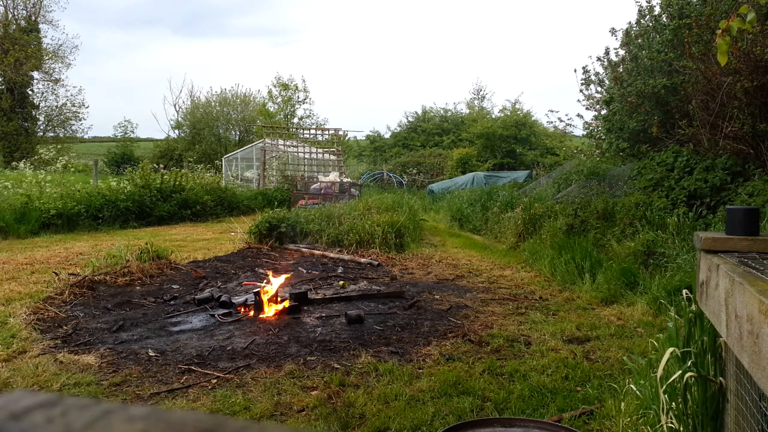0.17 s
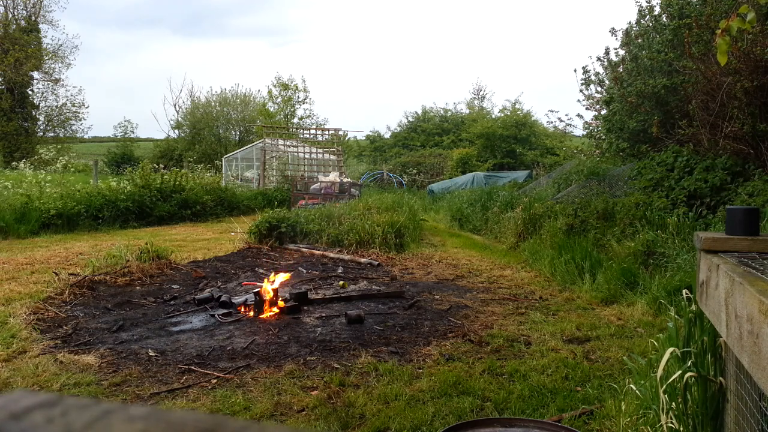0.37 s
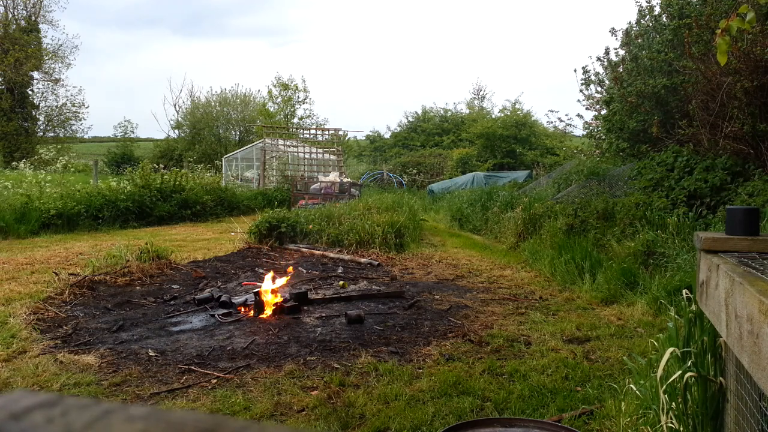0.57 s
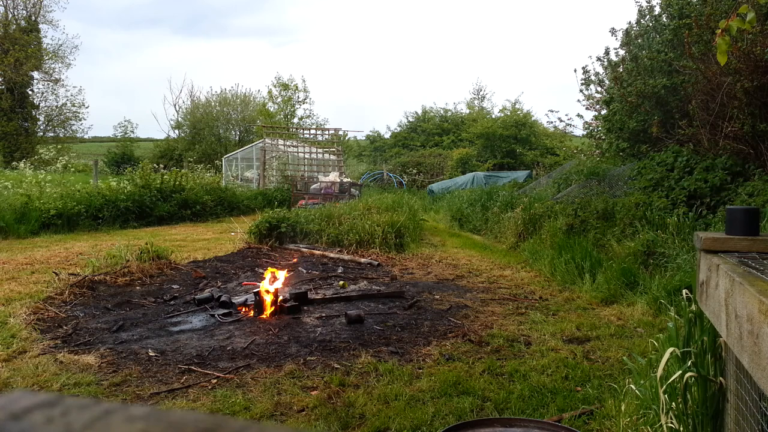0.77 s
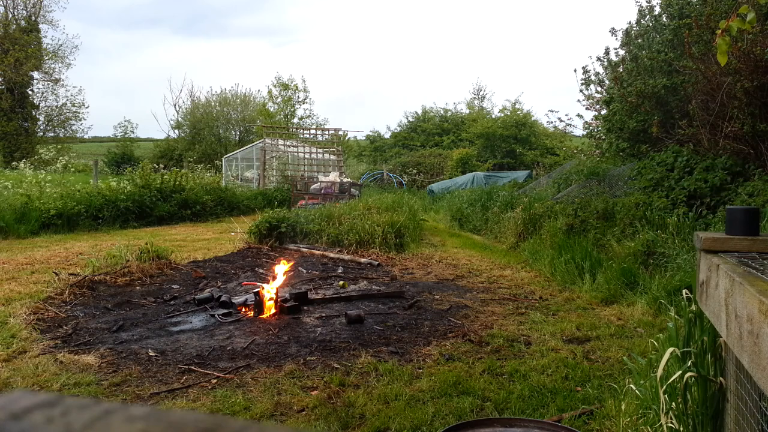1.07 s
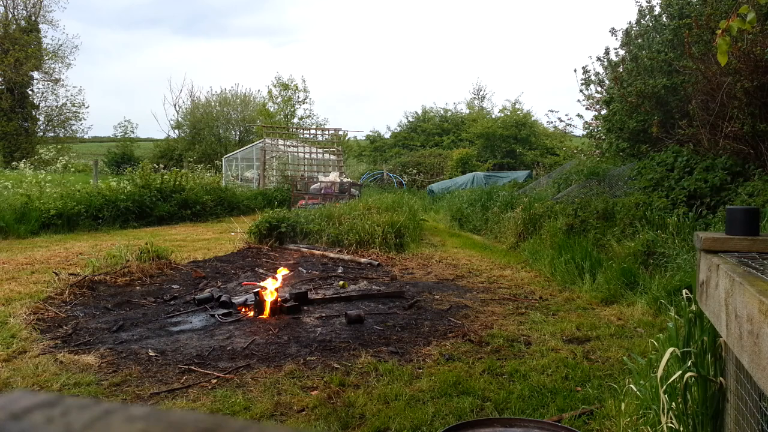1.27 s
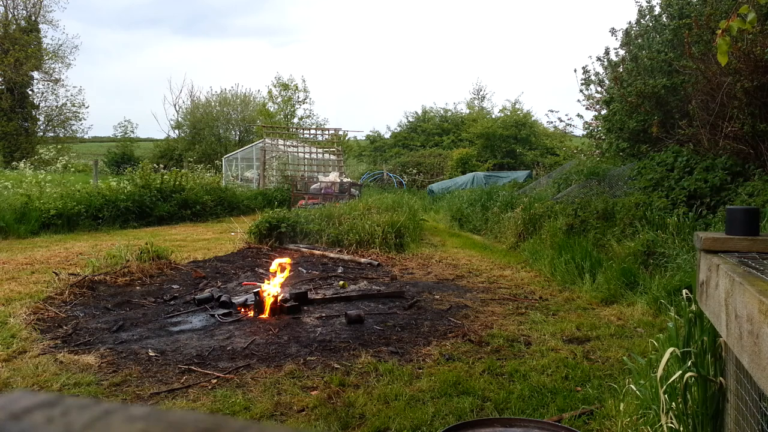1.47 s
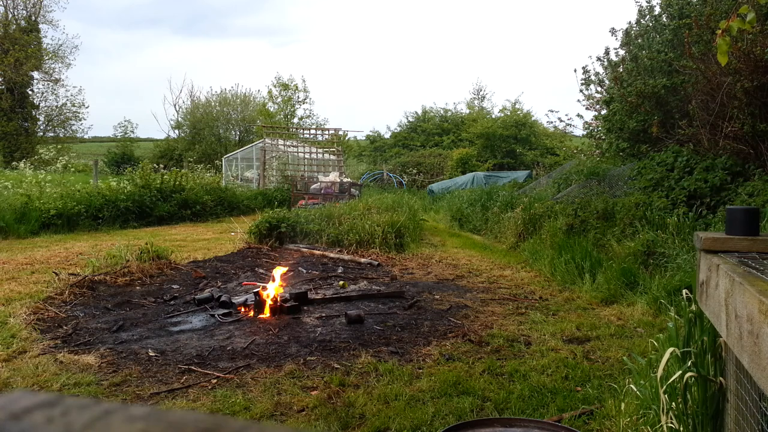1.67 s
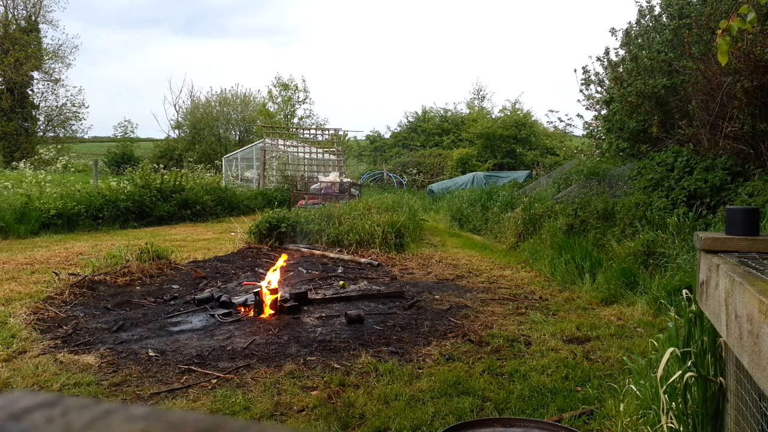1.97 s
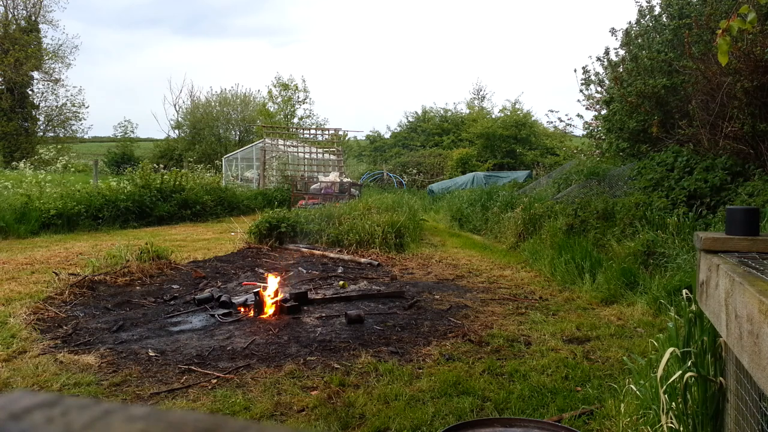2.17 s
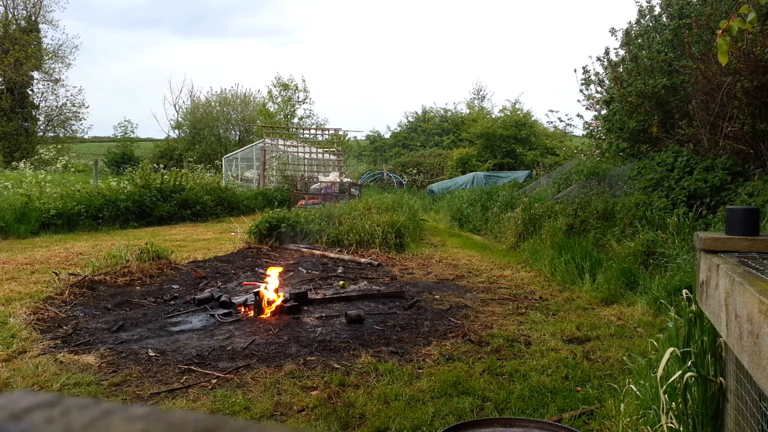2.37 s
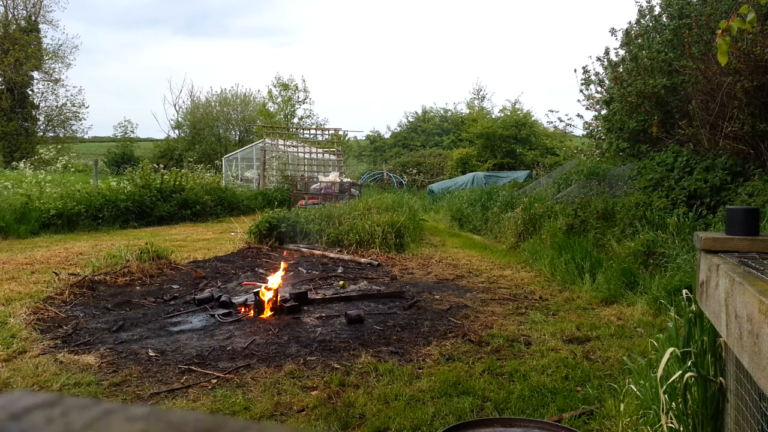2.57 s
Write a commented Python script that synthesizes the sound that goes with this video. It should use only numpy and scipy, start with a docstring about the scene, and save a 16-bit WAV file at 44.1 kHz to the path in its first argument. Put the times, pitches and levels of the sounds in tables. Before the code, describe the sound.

Small wood fire crackling and softly fluttering outdoors, with birdsong and faint twitters over quiet air

```python
"""A quiet garden with a small bonfire, a few metres from two spaced microphones.
The wood crackles as sharp clicks that ring briefly; the flames flap as low pushes of a few cycles.
One songbird whistles ahead, another to the side, and small birds twitter far off: all wavering sines.
Filtered noise makes the distant country rumble and the microphone hiss behind them."""
import sys
import numpy as np
from scipy import signal
from scipy.fft import rfft, irfft, next_fast_len
from scipy.io import wavfile

SR = 44100
rng = np.random.default_rng(int(sys.argv[2]) if len(sys.argv) > 2 else 0)


def put_to_file(sound):
    """Save the sound as 16-bit audio at rate SR, in the file named by the first command-line argument."""
    columns = np.atleast_2d(sound).T  # one column per channel
    safe = np.clip(columns, -1, 1)
    whole_steps = np.round(safe * 32767)
    wavfile.write(sys.argv[1], SR, whole_steps.astype(np.int16))


def rack_gain(trim_db):
    """Turn a fader trim in dB into the linear factor to multiply a signal by."""
    fader = np.asarray(trim_db, float)
    return 10 ** (fader / 20)


N = 120393  # length in samples

# rumble, leaves and hiss, shape of the spectrum: (f/Hz, relative level per Hz/dB)
AIR_SPECTRUM = [(35, -38), (60, -8.5), (97, -1.5), (147, -1.5), (450, -9), (517, -3.5), (593, -13.5),
                (817, -11), (1290, -17), (1740, -16), (3880, -19.5), (5340, -24.5), (5990, -26),
                (9690, -22.5), (14300, -23.5)]
# overall loudness of the air: (t/s, rms level/dB)
AIR_LOUDNESS = [(0.0, -55.5), (0.22, -55.5), (1.08, -55), (1.56, -57), (1.75, -55.5), (2.73, -56)]
# how alike the air is at left and right: (f/Hz, likeness, 1 = the same)
AIR_LIKENESS = [(25, 0.27), (60, 0.77), (200, 0.12), (700, 0.12), (1500, 0.015), (5000, 0.015),
                (15000, .02)]
AIR_FLICKER_DB = 0.24

# notes of the bird to the side: (start t/s, length/s, from f/Hz, to f/Hz, level/dB)
SIDE_NOTES = [(0., 0.065, 1810, 1715, -65), (0.38, .1, 3385, 4200, -69), (0.819, 0.05, 1875, 1800, -63),
              (0.987, 0.039, 2570, 1324, -63), (1, 0.028, 1900, 1880, -78)]
# twitters of far birds: (start t/s, length/s, from f/Hz, to f/Hz, level/dB, left minus right/dB)
TWITTERS = [(0.205, 0.05, 2243, 2084, -73, -14), (0.656, 0.023, 2690, 2510, -62.5, -5),
            (0.696, 0.042, 2520, 2510, -71.5, 3), (1.185, 0.056, 1456, 1460, -70, 6),
            (1.272, 0.048, 1500, 1555, -72, 10), (1.365, 0.056, 1490, 1536, -72, 9),
            (1.69, .055, 2370, 2406, -71.5, 0), (1.722, .02, 2560, 2680, -68, 4),
            (1.687, 0.04, 3880, 3610, -68, -8), (1.771, 0.046, 2124, 2237, -66.5, 1),
            (1.795, 0.0257, 3256, 3030, -63, -2.), (1.847, 0.087, 2890, 2870, -74, -3),
            (1.87, .06, 4050, 4120, -76, -14), (2.01, 0.025, 5240, 5500, -67.5, 1),
            (2.03, 0.03, 2550, 2610, -71.5, -3), (2.064, 0.037, 2750, 2950, -69, -6),
            (2.079, .012, 3520, 3700, -68, 0), (0.147, 0.043, 7550, 7800, -70, 2),
            (2.154, 0.0175, 3750, 3980, -65, -1.), (2.243, 0.031, 5100, 5520, -69.5, 5),
            (2.325, 0.019, 2940, 3080, -69, -2), (2.394, 0.014, 3850, 4070, -58.5, -1.),
            (2.408, 0.045, 2867, 2885, -64, -4), (2.545, 0.027, 4550, 4660, -69, 2.),
            (2.588, 0.046, 4730, 4690, -66.5, 0), (2.539, .04, 3800, 3780, -79, -10),
            (2.651, 0.02, 3770, 3810, -71, -11), (2.69, 0.033, 4700, 4800, -73, 1)]
# whistled phrases of the bird ahead, one list a note: (t/s, f/Hz, level/dB)
# at times both halves of its voice box sound together
SONG = [
    [(0.26, 2298, -56), (0.266, 2369, -64.5), (0.312, 2305, -63.5), (0.333, 2270, -62.5),
     (0.355, 2342, -62), (0.406, 2325, -67), (0.46, 2200, -68), (0.5, 2080, -69), (0.525, 1996, -64)],
    [(0.53, 1928, -69), (0.62, 1924, -69.5), (0.644, 1810, -68), (0.65, 1813, -75)],
    [(0.68, 1921, -63), (0.696, 1899, -67.5), (0.745, 2002, -66), (0.79, 2022, -65), (0.83, 2140, -66.5),
     (0.878, 2210, -61.5), (0.92, 2190, -72), (0.96, 2176, -65)],
    [(0.97, 2560, -75), (0.98, 2520, -63.5), (1.02, 2380, -60.5), (1.06, 2290, -62), (1.08, 2074, -68),
     (1.105, 1904, -60.5), (1.16, 1910, -54.5), (1.17, 1960, -69), (1.185, 2020, -68)],
    [(1.075, 2257, -63), (1.12, 2194, -63), (1.165, 2280, -69)],
    [(1.19, 1732, -59), (1.196, 1727, -70), (1.24, 1772, -66)],
    [(1.28, 1764, -70), (1.35, 1796, -64), (1.368, 1783, -87), (1.385, 1770, -66), (1.436, 1767, -65.5),
     (1.498, 1784, -69), (1.535, 1777, -65), (1.58, 1793, -69), (1.6, 1810, -84), (1.62, 1856, -68),
     (1.668, 1858, -65.5), (1.73, 1815, -72)],
    [(1.87, 1730, -69.5), (1.91, 1808, -75), (1.924, 1746, -64), (1.96, 1517, -69), (2.008, 1487, -64.5),
     (2.03, 1480, -81)],
    [(2.15, 2495, -74), (2.162, 2473, -66), (2.182, 2505, -64), (2.205, 2300, -71), (2.25, 2166, -77),
     (2.3, 2150, -74), (2.335, 2180, -78), (2.36, 2350, -71), (2.385, 2420, -77)],
    [(.46, 2317, -74), (.6, 2150, -74)],
    [(.74, 1870, -62.5), (.8, 1950, -68.5), (.91, 1880, -68)],
    [(.8, 1800, -71), (.87, 1794, -82)],
    [(1., 2510, -65), (1.07, 2380, -74)],
    [(1.075, 2300, -61.5), (1.165, 2340, -70)],
    [(2.2, 2430, -72), (2.27, 2360, -75)],
]
# where each note of the bird ahead sits: (left minus right/dB)
SONG_PAN_DB = [-1, 0, -3, 1.5, -1, -4, 3, 6.5, 5, 3, 0, 0, -6, 5, 4]
# how much later the left microphone hears each source; negative means the right is later
SIDE_LAG_S, TWITTER_LAG_S, SONG_LAG_S, FIRE_LAG_S = -0.0002, .00004, .00003, .00007
NOTE_EDGE_S = 0.0033  # soft start and end of a note
PITCH_WAVER, FAR_WAVER, WAVER_HZ = .005, .012, 110.  # waver as a share of the pitch, and its rate
THROB_DB, THROB_HZ = 1.5, 70.  # quick level waver of each note
FADING_DB, FADING_HZ = 2., 50.  # level waver at each microphone
GARDEN_T60_S, GARDEN_DB = 0.3, -7.  # time for the echoes to fall by 60 dB, and their strength

# sharp cracks of the wood:
# (t/s, strike level at 4 kHz/dB, brightness/dB per octave, left minus right at 4 kHz/dB)
CRACKS = [(0.016, -45, 1, -13), (0.1122, -35.5, 2.5, -10), (0.3033, -40, -1, 0), (0.3073, -44, 8, -10),
          (0.3127, -39, 0, -4), (.53, -39.5, -8, -6), (.6072, -37, -3, -1), (0.6148, -38.5, -6, -6),
          (0.7454, -31, -1.5, 0), (0.8788, -34, -2, -5), (0.9407, -38, -5, -1.), (1.3998, -41, 0, -5),
          (1.6306, -38, 0, -5.), (1.6329, -37, -2, -6), (1.6356, -37, -7, -4), (1.6464, -41, -1, 9),
          (1.6475, -40, -6, -1), (1.662, -27, 1.5, -4.8), (1.862, -38, 1, -8), (1.978, -36, 1, -7),
          (2.5912, -36.5, 4, -8.5)]
# the fibres tear on after a crack: (mean delay/s, level against the crack/dB)
SPLINTERS = [(.0005, -8.), (.0015, -13.), (.004, -15.), (.009, -21.)]
# what a crack rings with: (f/Hz, level/dB, time to fall by 60 dB/s)
EMBER_MODES = [(1800, -20.5, 0.0018), (2120, -23, 0.003), (3630, -11, 0.0026), (4800, -15, 0.0031),
               (8130, -19.5, 0.0045), (10030, -13.5, 0.0018), (13200, -17, 0.0015)]
CRACK_COLOUR_DB = 1.5  # chance spread of the strike from mode to mode
MODE_STAGGER_S = .0001  # the modes start spread over about this time
CRACK_LOW_HZ = 1300.  # a splinter is too small to radiate bass
LEFT_BRIGHTER_DB = 12  # left minus right, per octave above 4 kHz
GROUND_ECHO_S, GROUND_ECHO_DB = .0006, -21.5
CRACK_ECHO_DB = -4.  # added to the garden's own echo strength
TICKS_PER_S = 300.  # before the rate swings
TICK_DB, TICK_SPREAD_DB = -54, 3.  # smallest tick strike, and spread above it

# dull flaps of the flames: (t/s, push strength/dB, f/Hz, sharpness/dB, left minus right/dB)
FLAPS = [(0.125, -43, 218, -0.5, -6), (0.159, -65, 151, 0.1, 1), (0.194, -38.5, 237, 2, -1),
         (0.222, -42.5, 312, -2, 8), (0.249, -38.5, 292, -4.5, -2), (0.283, -52, 204, -2, 3),
         (0.386, -44, 180, 2.5, -4), (0.425, -38.5, 190, -1.5, -2), (0.489, -54, 347, -2, 1.5),
         (0.679, -50, 150, -1, -6), (0.816, -41, 365, -2, -3), (0.86, -52.5, 242, 9, 2.5),
         (0.954, -43, 220, 4, 2), (0.977, -44.5, 170, 4.5, -2), (0.994, -41.5, 305, 0, 4),
         (1.051, -54.5, 159, 10, 3), (1.1, -38.5, 280, -5, -2), (1.158, -42, 322, 0, 2),
         (1.212, -49.5, 296, 1.5, 7), (1.266, -65, 239, -6, 0), (1.305, -48, 245, 6.5, -4),
         (1.398, -44.5, 190, 2, 7), (1.675, -51, 218, 2, -23), (1.712, -41.5, 313, -3, -1),
         (1.818, -43, 318, -3, 7), (1.867, -40, 450, -13, 3), (1.921, -43.5, 205, -1, 0.5),
         (1.979, -44.5, 250, 1, -6), (2.029, -43, 280, 3.5, 3), (2.165, -60, 258, -17, -1),
         (2.192, -36, 182, -6.5, -1), (2.435, -47.5, 146, 7.5, 0), (2.458, -46.5, 234, 7, 3),
         (2.597, -48, 157, 6.5, 3), (2.643, -61, 306, 18.5, 2.0)]
# sharper, higher part that follows the start of a flap:
# (multiple of its pitch, level before sharpness/dB)
FLAP_SNAP = [(2.1, 0.5), (3.6, -39)]
FLAP_SNAP_S = 0.002956  # delay of this part
FLAP_CYCLES = 2.16  # cycles in which one ringing falls by 60 dB
FLUTTERS_PER_S = 120.  # before the rate swings
FLUTTER_DB, FLUTTER_SPREAD_DB = -66.5, 5  # rms before the flame band filter, and spread of sizes
FLUTTER_HZ, FLAME_HZ = (124, 760), (170., 1500.)  # flutter pitches, band of all flame sound

MIC_LOW_HZ, MIC_HIGH_HZ = 61.7, 14970


def rms_one(x):
    """Scale to an rms of 1."""
    return x / np.sqrt(np.mean(x ** 2) + 1e-20)


def at_hz(points, hz):
    """Read a spectrum table, drawing straight lines on a log frequency scale."""
    table_hz, value = np.transpose(points)
    return np.interp(np.log(hz), np.log(table_hz), value)


def drift(rate_hz):
    """Smooth chance wandering with a spread of 1, made from slowed-down noise."""
    r = np.exp(-80 * np.pi * rate_hz / SR)  # computed at every 40th sample
    noise = rng.standard_normal(N // 40 + 2002)
    slow = signal.lfilter([1], [1, -2 * r, r * r], noise)[2000:]  # skip the settling
    return np.interp(np.arange(N) / 40, np.arange(len(slow)), rms_one(slow - slow.mean()))


def ring(clicks, hz, t60):
    """A resonance: a unit click starts a sine of height 1 that falls by 60 dB in t60 seconds."""
    r, w = rack_gain(-60 / (t60 * SR)), 2 * np.pi * hz / SR
    return signal.lfilter([0, np.sin(w)], [1, -2 * r * np.cos(w), r * r], clicks + 1e-18)


def random_starts(per_s):
    """Chance events whose rate swings slowly up and down."""
    return rng.random(N) < per_s * rack_gain(3. * drift(6.)) / SR


def spaced(x, lag_s):
    """Sound takes time to travel: the left microphone hears it lag_s later than the right."""
    x, size = np.broadcast_to(x, (2, N)), next_fast_len(N + 64)
    half_shift = np.pi * np.fft.rfftfreq(size, 1 / SR) * lag_s * np.array([[1], [-1]])
    return irfft(rfft(x, size) * np.exp(-1j * half_shift), size)[:, :N]


def pan(db):
    """Left and right gains for a level difference in dB."""
    half = .5 * np.asarray(db)
    return rack_gain(np.array([half, -half]))


def whistle(s, hz, db, waver=PITCH_WAVER):
    """A near sine along a pitch and level curve, with soft edges and a slight waver."""
    t = np.arange(N) / SR
    edge = np.clip(np.minimum(t - s[0], s[-1] - t) / NOTE_EDGE_S + .5, 0, 1)
    pitch = np.interp(t, s, hz) * (1 + waver * drift(WAVER_HZ))
    level = rack_gain(np.interp(t, s, db) + THROB_DB * drift(THROB_HZ))
    return np.sqrt(2) * level * edge * np.sin(2 * np.pi * np.cumsum(pitch) / SR)


def garden(x):
    """Scattered echoes from hedges and sheds: fading noise, different at each microphone."""
    t = np.arange(int(.4 * SR)) / SR
    tail = rng.standard_normal((2, len(t))) * rack_gain(-60 * t / GARDEN_T60_S)
    tail = tail * (t > .004)  # no echo arrives at once
    tail = tail / np.sqrt((tail ** 2).sum(axis=1, keepdims=True))
    return rack_gain(GARDEN_DB) * signal.fftconvolve(x, tail, axes=1)[:, :N]


def air():
    """Third-octave bands of stereo noise, each with its own level, flicker and likeness."""
    out, together = 0, drift(3.)
    edges = 20 * 2 ** (np.arange(30) / 3)
    white = rng.standard_normal((2, 2, N))
    for k, (low, high) in enumerate(zip(edges, edges[1:])):
        band = signal.butter(2, [low, high], "band", fs=SR, output="sos")
        mid, side = signal.sosfilt(band, white[k % 2])  # neighbouring bands use different noise
        hz = np.sqrt(low * high)
        alike = np.clip(at_hz(AIR_LIKENESS, hz), -1, 1)
        flicker_db = AIR_FLICKER_DB * (0.09 * together + drift(6.9))
        gain = rack_gain(at_hz(AIR_SPECTRUM, np.clip(hz, 60, 14300)) + flicker_db)
        out = out + gain * (np.sqrt(1 + alike) * mid + np.sqrt(1 - alike) * side * [[1], [-1]])
    s, db = np.transpose(AIR_LOUDNESS)
    return rack_gain(np.interp(np.arange(N) / SR, s, db)) * rms_one(out)


def bird_to_the_side():
    """Short whistles, each gliding straight from one pitch to another."""
    notes = sum(whistle([s, s + d], [a, b], [db, db]) for s, d, a, b, db in SIDE_NOTES)
    return spaced(notes, SIDE_LAG_S)


def crackle():
    """Cracks and a random rain of small ticks strike the ember modes, then bounce off the ground."""
    s, db, tilt_db, pan_db = np.transpose(CRACKS)
    at = (s * SR).astype(int)
    colour = rng.standard_normal((len(s), len(EMBER_MODES)))
    tear = rng.random((len(s), len(SPLINTERS)))
    starts = random_starts(TICKS_PER_S)
    ticks = starts * rack_gain(TICK_DB + TICK_SPREAD_DB * np.minimum(rng.exponential(1, N), 3))
    out = 0
    for k, (hz, mode_db, t60) in enumerate(EMBER_MODES):
        clicks = np.tile(ticks * rack_gain(CRACK_COLOUR_DB * rng.standard_normal(N)), (2, 1))
        octaves = np.log2(hz / 4000)
        strike = rack_gain(db + tilt_db * octaves + CRACK_COLOUR_DB * colour[:, k])
        clicks[:, at] = pan(pan_db + LEFT_BRIGHTER_DB * octaves) * strike
        for j, (delay, splinter_db) in enumerate(SPLINTERS):
            later = at + (2 * delay * tear[:, j] * SR).astype(int) + 1
            spread_db = 2 * CRACK_COLOUR_DB * rng.standard_normal(len(s))
            clicks[:, later] = clicks[:, at] * rack_gain(splinter_db + spread_db)
        # the modes do not all start together
        clicks = np.roll(clicks, int(MODE_STAGGER_S * SR * k / len(EMBER_MODES)), axis=1)
        out = out - rack_gain(mode_db) * ring(clicks, hz, t60)
    out = signal.sosfilt(signal.butter(3, CRACK_LOW_HZ, "high", fs=SR, output="sos"), out)
    lag = int(GROUND_ECHO_S * SR)
    out = out + rack_gain(GROUND_ECHO_DB) * np.pad(out, ((0, 0), (lag, 0)))[:, :N]
    return out + rack_gain(CRACK_ECHO_DB) * garden(out)


def flutters():
    """Small random pushes of the flames, shared out among ten low resonances."""
    sizes = rack_gain(FLUTTER_SPREAD_DB * np.minimum(rng.exponential(1, N), 4)) * rng.choice([-1, 1], N)
    pushes = sizes * random_starts(FLUTTERS_PER_S)
    dealt = rng.integers(0, 10, N)
    small = 0
    for k, hz in enumerate(np.geomspace(*FLUTTER_HZ, num=10)):
        small = small + ring(pushes * (dealt == k), hz, FLAP_CYCLES / hz)
    small = signal.sosfilt(signal.butter(2, FLUTTER_HZ[1], fs=SR, output="sos"), small)
    return rack_gain(FLUTTER_DB) * rms_one(small)


def flaps():
    """Each flap is a low push of a few cycles, followed by a sharper, higher part."""
    out = np.zeros((2, N))
    for s, db, hz, sharp_db, pan_db in FLAPS:
        click = np.zeros(N)
        click[int(s * SR)] = rack_gain(db)
        t60 = FLAP_CYCLES / hz
        # ringing twice over makes the push swell softly
        push = ring(ring(click, hz, t60), hz, t60) * hz / SR * 10
        snap_click = np.roll(click, int(FLAP_SNAP_S * SR))
        for multiple, snap_db in FLAP_SNAP:
            snap = ring(snap_click, hz * multiple, t60 / multiple)
            push = push + rack_gain(snap_db + sharp_db) * snap
        out = out + pan(pan_db)[:, None] * push
    return out


def flames():
    """Flutters and flaps together, kept to the low band of flame sound."""
    band = signal.butter(2, FLAME_HZ, "band", fs=SR, output="sos")
    return signal.sosfilt(band, flutters() + flaps())


def far_twitters():
    """Short gliding whistles from many places, with a stronger pitch waver."""
    out = 0
    for s, d, a, b, db, pan_db in TWITTERS:
        out = out + pan(pan_db)[:, None] * whistle([s, s + d], [a, b], [db, db], FAR_WAVER)
    return spaced(out, TWITTER_LAG_S)


def bird_ahead():
    """Whistled phrases: each note is a sine that follows its own pitch and level curve."""
    out = 0
    for note, pan_db in zip(SONG, SONG_PAN_DB):
        out = out + pan(pan_db)[:, None] * whistle(*np.transpose(note))
    return spaced(out, SONG_LAG_S)


def birds():
    """All singers with echoes; leaves on the path make all but the side bird waver in level."""
    ahead, side, far = bird_ahead(), bird_to_the_side(), far_twitters()
    fading = rack_gain(FADING_DB * np.array([drift(FADING_HZ), drift(FADING_HZ)]))
    direct = fading * (ahead + far) + side
    return direct + garden(direct)


def scene():
    """Fire in front, birds around, air behind."""
    return spaced(crackle() + flames(), FIRE_LAG_S) + birds() + air()


def top_cut(x):
    """Nothing passes above the cut-off."""
    return signal.sosfilt(signal.butter(12, 15680, fs=SR, output="sos"), x)


def record(dry):
    """The microphones cut the deep bass and the top."""
    low = signal.butter(2, MIC_LOW_HZ, "high", fs=SR, output="sos")
    top = signal.cheby2(10, 30, MIC_HIGH_HZ, fs=SR, output="sos")
    mix = signal.sosfilt(np.vstack([low, top]), dry)
    return top_cut(mix)


dry = scene()
out = record(dry)
put_to_file(out)
```